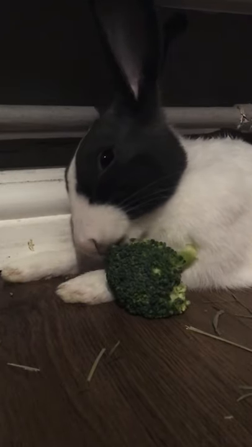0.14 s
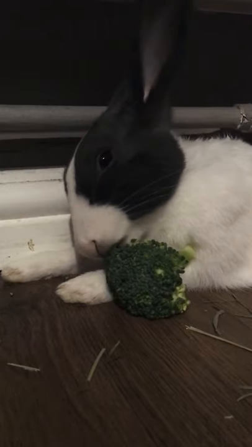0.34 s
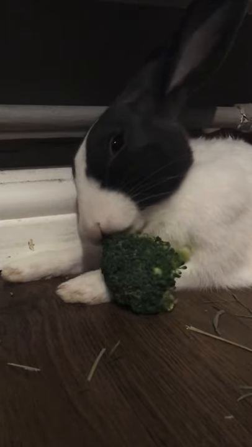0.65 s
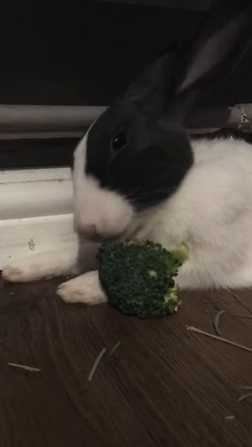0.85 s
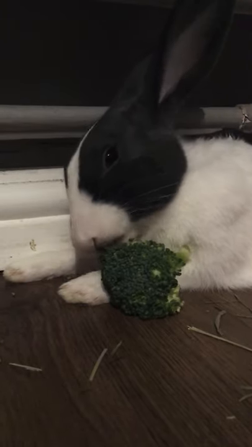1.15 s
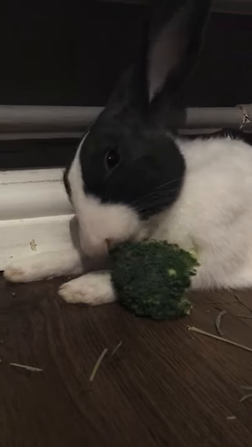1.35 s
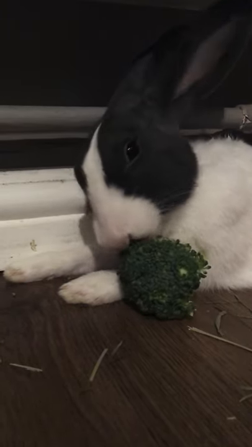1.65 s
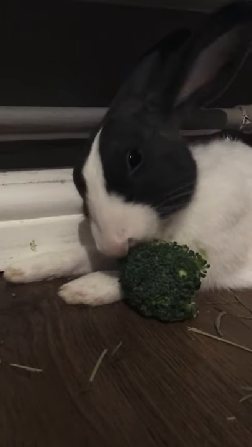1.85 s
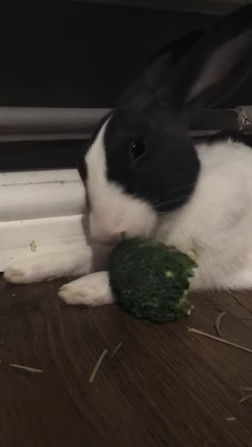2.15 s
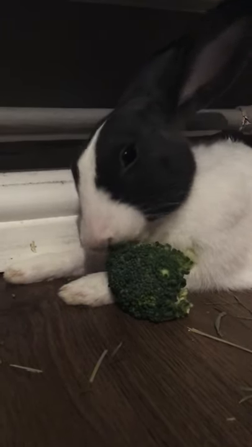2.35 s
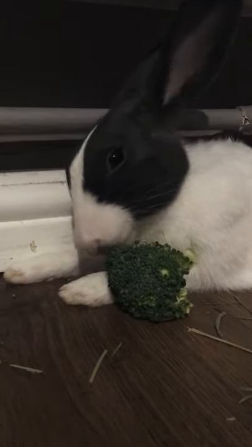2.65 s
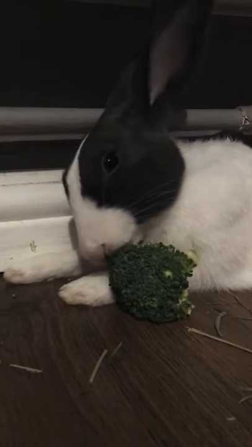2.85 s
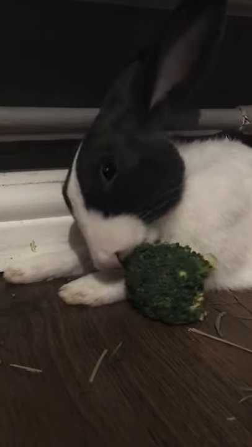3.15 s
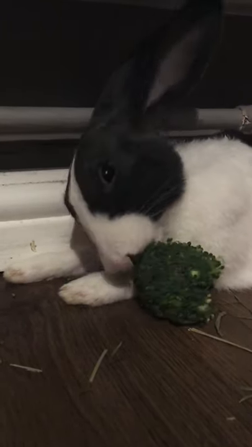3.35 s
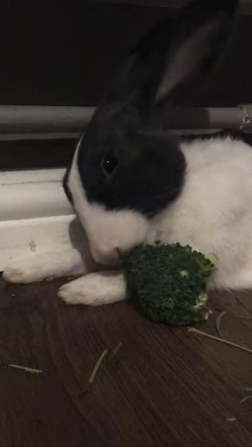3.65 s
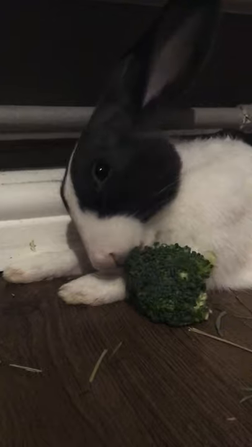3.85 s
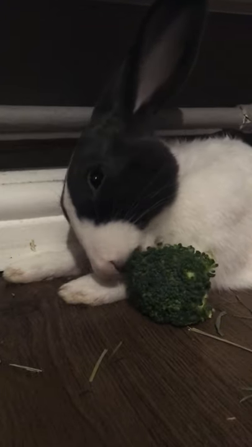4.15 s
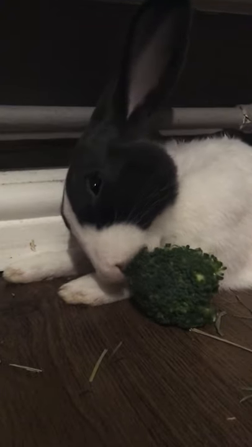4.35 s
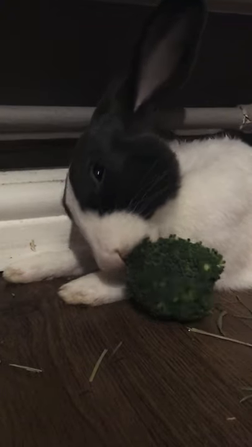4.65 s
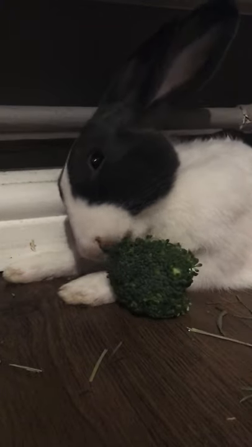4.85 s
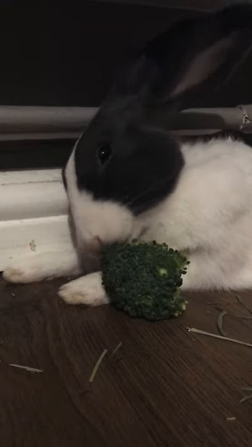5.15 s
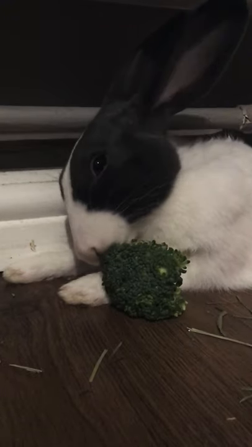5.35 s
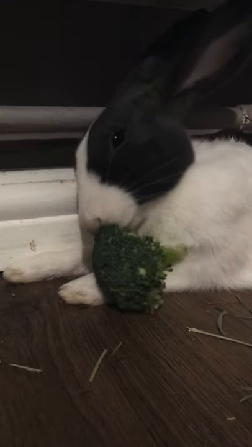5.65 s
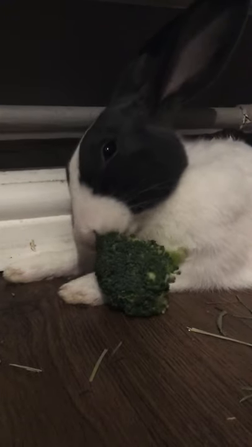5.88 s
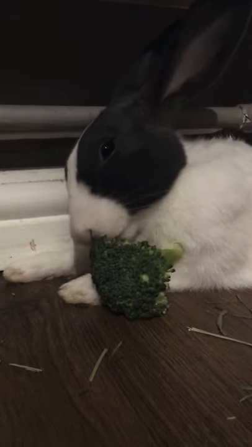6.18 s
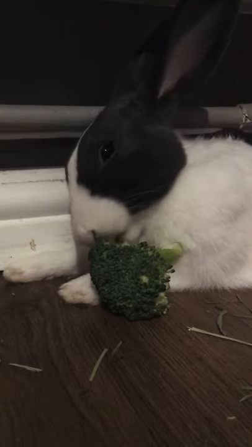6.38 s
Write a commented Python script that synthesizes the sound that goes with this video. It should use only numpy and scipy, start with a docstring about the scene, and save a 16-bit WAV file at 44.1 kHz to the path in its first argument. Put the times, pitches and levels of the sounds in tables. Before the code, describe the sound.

Close to the microphone, a rabbit nibbles raw broccoli in a quiet room. Tiny bright cracks come in irregular clusters as stems snap, with soft moist rustles of lips and teeth in the buds between them. Early on, the broccoli pats the wooden floor twice. Behind this, a distant engine hums through the walls, fading midway and then swelling toward the end, over a low rumble and faint hiss.

```python
"""Tiny bright cracks and soft rustles, close by: a rabbit nibbles raw broccoli on a wooden floor.
Each stem that snaps makes the stalk ring with a short knock. Lips and teeth rub through the buds,
and twice the broccoli pats the floor. Behind this, a far engine hums through the walls of the quiet
room, sinking in pitch, fading and swelling, over a low rumble and a faint hiss."""
import sys
import numpy as np
from scipy import signal
from scipy.fft import rfft, irfft
from scipy.io import wavfile
from scipy.ndimage import uniform_filter1d

SR = 44100
rng = np.random.default_rng(int(sys.argv[2]) if len(sys.argv) > 2 else 0)


def dump(signal):
    """Clip the signal to [-1, 1] and save it as 16-bit WAV at the path in sys.argv[1]."""
    limited = np.clip(np.atleast_2d(signal).T, -1, 1)
    pcm = np.round(limited * 32767).astype(np.int16)
    wavfile.write(sys.argv[1], SR, pcm)


N = 287532
TIME = np.arange(N) / SR


# One row for each stem that snaps: start_s, crack_db, crack_hz, tear_s, knock_db
STEM_SNAPS = [(0.1455, -58, 11600, .0002, -75), (0.2681, -56, 9800, 0.0007, -79),
              (0.527, -57, 12900, .0004, -72), (0.7083, -60, 10300, .0002, -67),
              (0.8596, -55.5, 10800, 0.00032, -73), (0.871, -53.5, 7500, .002, -72),
              (1.1752, -65, 12300, .0007, -62.5), (1.1992, -68, 10700, .0009, -64.5),
              (1.954, -39.5, 12600, 0.00028, -51), (1.9621, -39.5, 13200, 0.00009, -53.5),
              (1.9693, -38.5, 12600, 0.0006, -59), (1.974, -46, 12300, .0015, -74),
              (1.976, -48, 12100, 0.00034, -53.5), (2.0102, -54.5, 10900, .0002, -66),
              (2.5564, -59, 12600, .0002, -82), (2.7843, -50.5, 13200, 0.0003, -83),
              (3.407, -48, 13200, .0002, -55.5), (3.4126, -42, 12900, 0.00018, -57),
              (3.4311, -49, 12800, 0.00043, -55.5), (3.4644, -44.5, 11900, 0.00014, -51.5),
              (3.4682, -52, 10300, .0008, -63), (3.7281, -50.5, 12600, 0.00017, -83),
              (3.7582, -45, 10900, .0002, -75), (3.762, -56, 10500, .0004, -71),
              (3.779, -57, 10500, .0004, -62), (3.797, -66, 11000, .0004, -62),
              (4.2765, -53.5, 11300, .0003, -70), (4.6328, -61, 9400, 0.00076, -64.5),
              (4.6613, -50.5, 13700, 0.00037, -55), (4.69, -53, 12000, .0002, -61),
              (4.703, -55, 12000, .0004, -59), (4.7095, -53, 12600, .0002, -69),
              (4.757, -55, 12600, 0.00023, -59.5), (4.7612, -54, 11300, .0002, -63),
              (4.793, -54.5, 11800, .0002, -70), (5.0315, -53.5, 11500, 0.00023, -62.5),
              (5.0681, -53, 12300, .0012, -79), (5.0727, -36.5, 11900, 0.00052, -48.5),
              (5.0782, -48, 12600, .0002, -59), (5.1257, -52.5, 10200, .0002, -70),
              (5.3125, -54, 11200, .0002, -68), (5.3584, -52.5, 12600, .0002, -66),
              (5.534, -58.5, 12500, .0008, -77), (5.7934, -58, 11500, .0006, -80),
              (5.954, -53, 10600, .0006, -63), (5.9627, -56, 12700, .0004, -56),
              (5.971, -58, 11200, .0003, -57), (5.9927, -52.5, 11200, .0002, -60),
              (6.1156, -52.5, 11200, .0009, -73), (6.148, -56, 12600, .0006, -67),
              (6.2947, -52, 10000, .0002, -77)]

def snapping_stems(knock_hz=1650, knock_scatter=0.09):
    """Teeth cut through the thicker stems; the stalk rings a little higher or lower each time."""
    out = np.zeros(N)
    for start_s, crack_db, crack_hz, tear_s, knock_db in STEM_SNAPS:
        stalk_hz = knock_hz * np.exp(knock_scatter * rng.standard_normal())
        add(out, start_s, one_snap(crack_db, crack_hz, tear_s, knock_db, stalk_hz))
    return out


# The tone of a crack, from low to high: pitch_hz, level_db
CRACK_TONE = [(2000, -53), (5000, -20), (7300, -7), (9000, -2), (10300, -6), (11300, 0), (14200, -1),
              (16500, -17.5)]
# The notes that ring in stalk and jaw: pitch_hz, level_db, ring_s (time to fade by 60 dB)
STALK_NOTES = [(342, -9, 0.028), (534, -7, 0.011), (886, 2, 0.0079), (1180, -12, 0.027), (1630, -6, 0.011),
               (2274, 0, 0.0041), (3540, 2, 0.0031), (5720, 3.5, 0.0054)]

def one_snap(crack_db, crack_hz, tear_s, knock_db, knock_hz, crack_width_hz=8500, knock_lag_s=0.00036):
    """A stem breaks cell by cell within a millisecond or so; the freed stalk rings briefly after it."""
    t = np.arange(1024) / SR
    # the levels count a crack's energy as packed into 2 ms, and a knock's into 3 ms
    crack_scale, knock_scale = np.sqrt(np.array([.002, .003]) * SR / len(t))
    breaking = 0.4 * rng.standard_normal(len(t)) * np.exp(-t / tear_s)
    breaking[0] = 1  # the first sharp click
    crack = double_resonance(colour(breaking, CRACK_TONE), crack_hz, crack_width_hz)
    out = unit(crack) * crack_scale * undb(crack_db)
    # every bite grips the stalk at another place, which shifts its notes
    shifts = np.exp(0.075 * rng.standard_normal(len(STALK_NOTES)))
    ring = sum(undb(db - 60 * t / ring_s) * np.sin(2 * np.pi * hz * shift * t)
               for (hz, db, ring_s), shift in zip(STALK_NOTES, shifts))
    knock = unit(resonance(ring, knock_hz, width_hz=0.76 * knock_hz))
    add(out, knock_lag_s, knock * knock_scale * undb(knock_db))
    return out


# One row for each rub of the mouth: middle_s, length_s, pitch_hz, rustle_db, fizz_db, breadth
# (breadth runs from 0, a narrow wet smack, to 1, a wide rustle)
MOUTH_RUBS = [(0.123, 0.065, 1890, -72, -75, 1), (0.5, 0.097, 2500, -89, -76, 1),
              (1.045, 0.025, 2280, -67.5, -70, 0.4), (1.078, 0.04, 965, -63.5, -71, 1),
              (1.209, 0.15, 670, -72.5, -91, 0.9), (1.417, 0.059, 2800, -73.5, -75, .7),
              (1.566, 0.019, 690, -66, -92, .7), (1.907, 0.023, 1690, -73, -70, 0.8),
              (2.004, 0.015, 1680, -64, -75, 0.5), (2.284, 0.029, 2660, -73, -92, 0.1),
              (2.458, 0.042, 1640, -69, -70, 0.76), (2.648, 0.029, 2190, -71, -70, 0.1),
              (2.666, 0.021, 1480, -62, -74, 0.74), (3.079, 0.041, 1500, -76, -72, 1),
              (3.378, 0.022, 2200, -75, -77, 0.9), (3.81, 0.09, 1960, -68.5, -74.5, 0.8),
              (4.315, 0.021, 3640, -68.5, -72, 0.06), (4.43, 0.017, 1900, -68.5, -72.5, 1),
              (4.68, 0.085, 1000, -75, -78, 1), (4.82, 0.022, 2000, -88, -67.5, 1),
              (5.033, 0.025, 1700, -77, -75, 1), (5.343, 0.051, 1600, -70.5, -69, 1),
              (5.957, 0.046, 1280, -67, -62.5, 1), (6.128, 0.039, 2470, -82, -68.5, 1),
              (6.177, 0.045, 1990, -70, -70, 1), (6.238, 0.053, 1090, -74, -86, 0.4),
              (6.369, 0.056, 1170, -67, -68.5, 1)]
# The tone of crushed buds: pitch_hz, level_db
FIZZ_TONE = [(2000, -10), (4900, -7.5), (5700, -2.5), (7500, -4.5), (9200, 3), (10400, 0.5), (11500, 0),
             (14000, -3.5), (16000, -26)]

def rustling_mouth(fizz_boost_db=2, pitch_step=1.55):
    """Lips and teeth drag over the buds: moist ticks swell, pitched in the mouth and fizzy outside it."""
    out = np.zeros(N)
    for middle_s, length_s, pitch_hz, rustle_db, fizz_db, breadth in MOUTH_RUBS:
        t = np.arange(-2 * length_s, 2 * length_s, 1 / SR)
        swell = np.exp(-np.abs(t / (0.25 * length_s)) ** 1.13 / 2)
        crackle = np.zeros(len(t))
        for hz in pitch_hz * pitch_step ** (breadth * np.array([-1, 0, 1])):  # low, middle, high
            moist_ticks = swell * ticks(len(t), per_s=600, spread_db=3.5)
            crackle += resonance(moist_ticks, hz, width_hz=0.52 * breadth * hz)
        rustle = unit(resonance(crackle, pitch_hz, width_hz=pitch_hz)) * undb(rustle_db)
        bud_ticks = swell * ticks(len(t), per_s=4000, spread_db=1)
        fizz = unit(colour(bud_ticks, FIZZ_TONE)) * undb(fizz_db + fizz_boost_db)
        add(out, middle_s + t[0], (rustle + fizz) * np.sqrt(np.mean(swell ** 2)))
    return out


def breaking_buds(per_rub=3, crack_boost_db=4, scatter_db=2):
    """Each rub also breaks a few thin bud stems, which follow its strength and knock at its pitch."""
    out = np.zeros(N)
    for middle_s, length_s, pitch_hz, rustle_db, fizz_db, _ in MOUTH_RUBS:
        for when, strength in rng.standard_normal((per_rub, 2)):
            extra_db = scatter_db * strength
            snap = one_snap(fizz_db + crack_boost_db + extra_db, crack_hz=12200, tear_s=.0005,
                            knock_db=rustle_db + extra_db, knock_hz=pitch_hz)
            add(out, middle_s + 0.45 * length_s * when, snap)
    return out


def tearing_fibres(level_db=-74, typical_crack_db=-52, fade_s=0.009):
    """Just before and after each snap, nearby fibres give way, louder when the stem is thick."""
    out = np.zeros(N)
    t = np.arange(-1024, 1024) / SR
    for start_s, crack_db, *_ in STEM_SNAPS:
        fibres = unit(colour(ticks(len(t), per_s=1800, spread_db=4), FIZZ_TONE))
        swell = np.exp(-np.abs(t) / fade_s)
        thickness_db = 0.36 * (crack_db - typical_crack_db)
        add(out, start_s + t[0], fibres * swell * undb(level_db + thickness_db))
    return out


# One row for each bump on the floor: start_s, level_db, pitch_hz
FLOOR_BUMPS = [(1.074, -49, 423), (1.574, -47.5, 300)]

def floor_bumps(boost_db=2, rise_s=0.004, ring_s=0.033):
    """The soft head of the broccoli meets the boards with a dull pat."""
    out = np.zeros(N)
    t = np.arange(SR // 10) / SR
    for start_s, level_db, pitch_hz in FLOOR_BUMPS:
        pat = unit(double_resonance(rng.standard_normal(len(t)), pitch_hz, width_hz=pitch_hz))
        rise = 1 - np.exp(-t / rise_s)
        add(out, start_s, pat * rise * undb(level_db + boost_db - 60 * t / ring_s))
    return out


# How loud the lips crackle as time goes by: time_s, level_db
CHEWING_LEVELS = [(0, -76.5), (1.0, -82.5), (1.3, -80.5), (2.1, -76), (2.9, -88), (4.0, -82.5),
                  (4.5, -78.5), (5.0, -77), (5.6, -82.5), (6.0, -73), (6.52, -76)]

def chewing(flurry_db=10.5):
    """The lips keep up a faint moist crackle between the bites, in quick little flurries."""
    level_db, = curves(CHEWING_LEVELS)
    crackle = colour(ticks(N, per_s=600, spread_db=4), FIZZ_TONE)
    flurries = undb(flurry_db * np.tanh(drift(per_s=16)))
    return unit(crackle * flurries) * undb(level_db)


# How loud the engine's lowest note and the octave above it are: time_s, hum_db, octave_db
ENGINE_LEVELS = [(0, -58, -62.5), (0.2, -52, -65), (1.3, -53.5, -63), (2.1, -61.5, -84), (2.9, -69, -67.5),
                 (3.35, -57, -66.5), (4.1, -49, -60.5), (4.4, -43, -67.5), (5.92, -44, -66),
                 (6.2, -40.5, -69.5), (6.52, -45, -82)]

def far_engine(start_hz=102.6, slowing_per_s=.022, third_db=-38):
    """A far engine slows down steadily; the walls let through only its three lowest tones."""
    pitch_hz = start_hz * np.exp(-slowing_per_s * TIME)
    phase = 2 * np.pi * np.cumsum(pitch_hz) / SR
    hum_db, octave_db = curves(ENGINE_LEVELS)
    levels_db = [hum_db, octave_db, hum_db + third_db]
    return np.sqrt(2) * sum(undb(db) * np.sin(k * phase) for k, db in enumerate(levels_db, 1))


# How loud the rumble's low boom and the murky noise above it are: time_s, boom_db, murk_db
RUMBLE_LEVELS = [(0, -59, -76), (0.7, -58, -70), (1.3, -57, -70.5), (2.0, -61, -80), (3.2, -59, -70),
                 (3.9, -61.5, -76.5), (4.75, -60.5, -71), (5.3, -61, -79), (6.0, -61, -70.5),
                 (6.52, -57.5, -72)]
# The low notes at which the room booms: pitch_hz, width_hz, level_db
ROOM_NOTES = [(46.6, 6.8, 4.5), (68.3, 8.1, -0.5), (87.1, 13, 0), (141.4, 19.2, 0.5), (163.2, 12.9, -1),
              (177.4, 16.3, -8), (204.1, 24, -7), (226.1, 7.8, -8)]
# The tone of the murky noise: pitch_hz, level_db
MURK_TONE = [(150, -17.5), (240, 2), (300, 2), (400, 2), (490, -6), (600, 1), (780, -13), (1300, -16),
             (3000, -36.5)]

def room_rumble(deep_db=-60.5, deep_below_hz=100, boom_boost_db=1, widen=1.39, flicker_db=0.9):
    """Rumble from outdoors booms at the room's own notes; the deepest hold, the rest swell and fade."""
    boom_db, murk_db = curves(RUMBLE_LEVELS)
    deep, boom = np.zeros(N), np.zeros(N)
    for pitch_hz, width_hz, level_db in ROOM_NOTES:
        note = undb(level_db) * double_resonance(rng.standard_normal(N), pitch_hz, widen * width_hz)
        add(deep if pitch_hz < deep_below_hz else boom, 0, note)
    murk = unit(colour(rng.standard_normal(N), MURK_TONE))
    murk *= undb(murk_db + flicker_db * drift(per_s=9))
    return unit(deep) * undb(deep_db) + unit(boom) * undb(boom_db + boom_boost_db) + murk


# The tone of the hiss: pitch_hz, level_db
HISS_TONE = [(200, 7), (1200, -2.5), (1700, -5.5), (2500, -5.5), (3800, -7.5), (4900, -12), (5600, -7.5),
             (7700, -10), (9200, -6.5), (10400, -10), (11500, -3.5), (14000, -5.5), (15700, -7),
             (16200, -31.5)]

def faint_hiss(level_db=-69):
    """An even hiss lies behind everything."""
    return unit(colour(rng.standard_normal(N), HISS_TONE)) * undb(level_db)


def room_echo(x):
    """Floor and skirting board scatter each sound at once; the room adds a faint tail."""
    t = np.arange(SR // 2) / SR
    echo = np.zeros(len(t))
    for level_db, ring_s, delay_s in [(-15, 0.014, .001), (-20, 0.24, .006)]:
        tail = rng.standard_normal(len(t)) * undb(-60 * t / ring_s)
        add(echo, delay_s, undb(level_db) * tail / np.linalg.norm(tail))
    return x + signal.fftconvolve(x, echo)[:N]


def ticks(n, per_s, spread_db):
    """Tiny breaks at random moments over n samples, a few larger than the rest."""
    size = undb(spread_db * np.minimum(rng.exponential(size=n), 4))
    return (rng.random(n) < per_s / SR) * rng.choice([-1, 1], n) * size


def drift(per_s):
    """A smooth random wander, about 1 in size, that takes per_s steps a second."""
    hold = int(SR / per_s)
    steps = np.repeat(rng.standard_normal(N // hold + 1), hold)
    return unit(uniform_filter1d(uniform_filter1d(steps, hold), hold)[:N])


def resonance(x, pitch_hz, width_hz):
    """Keep the sound near one pitch and weaken the rest."""
    return signal.lfilter(*signal.iirpeak(pitch_hz, pitch_hz / width_hz, fs=SR), x)


def double_resonance(x, pitch_hz, width_hz):
    """The same resonance twice, so less of the rest gets through."""
    return resonance(resonance(x, pitch_hz, width_hz), pitch_hz, width_hz)


def colour(x, tone, size=2048):
    """Shape the lows and highs of a sound to follow a tone table."""
    hz, db = np.transpose(tone)
    grid_hz = np.fft.rfftfreq(size, 1 / SR) + 1
    gain = undb(np.interp(np.log(grid_hz), np.log(hz), db))
    # fold the filter so that it rings only after a click, never before
    cepstrum = irfft(np.log(gain))
    cepstrum[1:size // 2] *= 2
    cepstrum[size // 2 + 1:] = 0
    click_response = irfft(np.exp(rfft(cepstrum)))
    return signal.fftconvolve(x, click_response)[:len(x)]


def curves(table):
    """Join a table's rows with straight lines: one curve for each column after the time."""
    time_s, *columns = np.transpose(table)
    return [np.interp(TIME, time_s, column) for column in columns]


def undb(db):
    """Turn decibels into a number to multiply by."""
    return 10 ** (np.asarray(db) / 20)


def unit(x):
    """Scale a sound to an average strength (rms) of 1."""
    return x / np.sqrt(np.mean(x ** 2) + 1e-30)


def add(out, start_s, x):
    """Mix x into out, beginning at start_s."""
    i = max(int(start_s * SR), 0)
    out[i:i + len(x)] += x[:max(len(out) - i, 0)]


def scene():
    """The rabbit close by, the engine far off, in one channel."""
    rabbit = snapping_stems() + tearing_fibres() + rustling_mouth() + breaking_buds()
    rabbit += floor_bumps() + chewing()
    return (room_echo(rabbit) + far_engine() + room_rumble() + faint_hiss())[None]


def record(dry, low_hz=36, top_hz=16600):
    """The phone thins the deepest bass and cuts the highest treble."""
    thinned = signal.sosfilt(signal.butter(4, low_hz, "high", fs=SR, output="sos"), dry)
    return signal.sosfilt(signal.ellip(8, .2, 70, top_hz, fs=SR, output="sos"), thinned)


dry = scene()
out = record(dry)
dump(out)
```